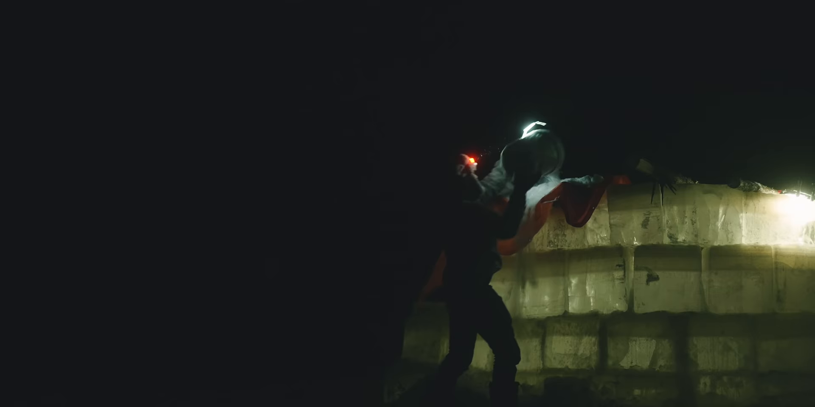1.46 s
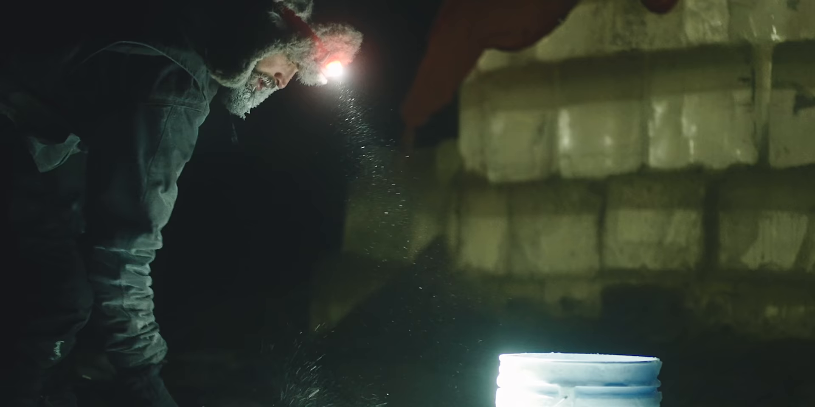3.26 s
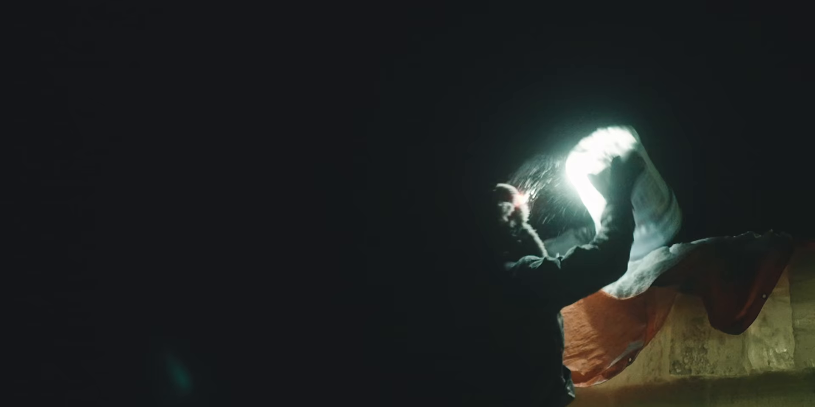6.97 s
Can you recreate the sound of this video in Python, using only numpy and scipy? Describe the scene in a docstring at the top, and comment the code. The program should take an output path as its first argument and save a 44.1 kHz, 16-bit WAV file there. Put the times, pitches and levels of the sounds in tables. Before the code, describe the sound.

Someone shovels snow on a quiet night: crisp digs, squeaky scrapes and loads landing, with pattering clods and soft footsteps.

```python
"""A snowy yard on a still night: someone shovels a few steps away.
The plastic blade crunches in, squeaks free and slaps its load down; this stroke is heard twice,
at the start and near the end. In between the blade knocks on packed snow, powder sifts down,
clods patter and boots crunch, over a faint low rumble.
The crunching is filtered clicks: ice bonds snapping in clumps."""
import sys
import numpy as np
from scipy import signal
from scipy.io import wavfile
from scipy.ndimage import uniform_filter1d

SR = 44100
rng = np.random.default_rng(int(sys.argv[2]) if len(sys.argv) > 2 else 0)


def wrap_up_sound(samples):
    """Save the sound to the file named by the first command line argument, as 16-bit audio."""
    columns = np.atleast_2d(samples).T
    # keep every value between -1 and 1, then stretch to whole-number steps
    tamed = np.clip(columns, -1, 1)
    steps = np.round(tamed * 32767).astype(np.int16)
    wavfile.write(sys.argv[1], SR, steps)


N = 342216
TIME = np.arange(N) / SR
SLAP_S, STROKE_GAP_S = 6.8165, 5.5055  # the load lands; the same stroke is heard again this much earlier
EDGE_HZ = 15850


def amp(db):
    """Decibels to gain."""
    return 10 ** (np.asarray(db) / 20)


def unit(x):
    """Scale to rms 1."""
    return x / np.sqrt(np.mean(x ** 2) + 1e-20)


def add(mix, start_s, sound):
    """Mix a sound in at start_s."""
    part = mix[max(round(start_s * SR), 0):][:len(sound)]
    part += sound[:len(part)]


def twice(x):
    """Add a copy one stroke gap earlier."""
    gap = round(STROKE_GAP_S * SR)
    return x + np.pad(x[gap:], (0, gap))


def colour(x, spectrum, size=4096):
    """Minimum-phase filter from rows of freq_hz, gain_db; attacks stay sharp."""
    hz, db = np.transpose(spectrum)
    bins_hz = abs(np.fft.fftfreq(size, 1 / SR))
    log_gain = np.log(amp(np.interp(np.log(bins_hz + 1), np.log(hz + 1), db)))
    taps = np.fft.ifft(np.exp(np.conj(signal.hilbert(log_gain)))).real[:size // 2]
    return signal.oaconvolve(x, taps)[:len(x)]


def band(x, hz, kind, order=2):
    """Butterworth low-pass or high-pass."""
    return signal.sosfilt(signal.butter(order, min(hz, EDGE_HZ), kind, fs=SR, output="sos"), x + 1e-18)


def resonate(x, hz, width_hz):
    """Two-stage resonance that can follow a pitch curve."""
    carrier = np.exp(2j * np.pi * np.cumsum(hz * np.ones(len(x))) / SR)
    pole = np.exp(-np.pi * width_hz / SR)
    baseband = signal.lfilter([1], [1, -2 * pole, pole ** 2], x * carrier.conj() + 1e-18)
    return unit((carrier * baseband).real)


def swell(peak_s, rise_s, fall_s, roundness=1):
    """Gain 1 at the peak, -20 dB one rise before and one fall after; roundness 1 pointed, 2 a bell."""
    away = np.maximum((peak_s - TIME) / rise_s, (TIME - peak_s) / fall_s)
    return amp(-20 * away ** roundness) * (away < 3)


def swells(rows, roundness):
    """Power sum of swells from rows of peak_s, rise_s, fall_s, gain_db."""
    return np.sqrt(sum((amp(db) * swell(*timing_s, roundness)) ** 2 for *timing_s, db in rows))


def grains(per_s, spread_db, clump_db, clump_s):
    """Ice bonds snap: clicks of uneven size, in clumps."""
    chance, size, sign = rng.random((3, N), dtype=np.float32)
    at, clicks = np.flatnonzero(chance < per_s / SR), np.zeros(N)
    clumps = np.clip(rng.standard_normal(8000), -2, 2)
    db = spread_db * np.minimum(-np.log(1 - size[at]), 4)
    db = db + clump_db * np.interp(TIME[at] / clump_s, np.arange(len(clumps)), clumps)
    clicks[at] = amp(db) * np.sign(sign[at] - 0.5)
    return unit(clicks)


def crumble(clicks, decay_s):
    """Each grain breaks up as one of six short noise bursts."""
    t = TIME[:512]
    choice = rng.integers(0, 6, N)
    bursts = rng.standard_normal((6, len(t))) * np.exp(-t / decay_s) * (1 - np.exp(-2 * t / decay_s))
    return unit(sum(signal.oaconvolve(clicks * (choice == k), unit(bursts[k]))[:N] for k in range(6)))


def blow(db, bright_hz, decay_s, spectrum, rise_s, size=4096):
    """A burst of crushed crystals with the energy of 5 ms at level db."""
    t = TIME[:size]
    burst = rng.standard_normal(size) * np.exp(-t / decay_s) * (1 - np.exp(-(t / rise_s) ** 2))
    sound = band(colour(burst, spectrum), bright_hz, "low", order=1)
    return amp(db) * unit(sound) * np.sqrt(0.005 * SR / size)


def blade(x, dry_db):
    """The plastic blade rings briefly with whatever touches it."""
    # blade modes: freq_hz, width_hz, gain_db
    modes = [(964, 35, -4), (1236, 48, -8), (1954, 47, -9), (2050, 29, -6.5), (3340, 27, 1),
             (3410, 41, -14), (3550, 85, -1), (4540, 63, 2.5), (5460, 110, -5), (6770, 130, 5),
             (7200, 73, -13)]
    t, ring = TIME[:2048], 0
    for hz, width_hz, db in modes:
        envelope = amp(db) * 2 * np.pi * width_hz / SR * np.exp(-np.pi * width_hz * t)
        ring += envelope * np.cos(2 * np.pi * hz * t)
    return amp(dry_db) * x + signal.oaconvolve(x, ring)[:N]


def thud():
    """Packed snow rings dully under a blow."""
    # snow modes: freq_hz, gain_db, t60_s
    modes = [(90, -40, 0.18), (123, -34, 0.11), (157, -28, 0.066), (243, -25.5, 0.037), (352, -23.5, 0.056),
             (553, -30, .025), (702, -25.5, 0.039), (1087, -22, 0.037)]
    t = TIME[:SR // 3]
    ring = sum(amp(db - 60 * t / t60_s) * np.sin(2 * np.pi * hz * t) for hz, db, t60_s in modes)
    return ring * (1 - np.exp(-t / 0.001))


def night():
    """Drifting low rumble, soft hiss and a faint wavering hum."""
    # night air spectrum: freq_hz, gain_db
    spectrum = [(12, -34), (20, -3.5), (38, -5), (96, -11.5), (123, -10.5), (146, -25), (222, -21),
                (388, -30.5), (624, -31.5), (759, -31), (1000, -34), (1120, -34), (6010, -42),
                (8650, -40.5), (16000, -45)]
    # rumble drift: time_s, gain_db
    drift = [(0, 3), (.7, -1.5), (1.3, 0.5), (2.1, -7.5), (3.0, -1), (4.0, 3), (5.4, 1), (6.2, -1.5),
             (6.8, 1), (7.7, -9)]
    air_db, rumble_hz, hum_db, hum_hz = -56, 86, -68.5, 120.8
    air = unit(colour(rng.standard_normal(N), spectrum, size=16384))
    rumble = signal.sosfiltfilt(signal.butter(2, rumble_hz, fs=SR, output="sos"), air)
    air += rumble * (amp(np.interp(TIME, *np.transpose(drift))) - 1)
    wander_cycles = 0.607 * np.cumsum(rng.standard_normal(N)) / np.sqrt(SR)
    hum = np.sqrt(2) * np.sin(2 * np.pi * (hum_hz * TIME + wander_cycles))
    return amp(air_db) * air + amp(hum_db) * hum


def yard(x):
    """Snow swallows most of the sound; the walls return a weak dull scatter."""
    t, t60_s, wet_db = TIME[:SR // 2], 0.21, -22
    tail = band(rng.standard_normal(len(t)) * amp(-60 * t / t60_s) * (t > 0.008), 3600, "low")
    return x + amp(wet_db) * signal.oaconvolve(x, tail / np.linalg.norm(tail))[:N]


def steps():
    """Snow collapses under a boot in small dull jerks while the weight bears down."""
    # footfalls: start_s, length_s, level_db
    footfalls = [(1.536, 0.29, -54), (1.998, 0.12, -56.5), (2.726, 0.073, -47), (3.078, .13, -53.5),
                 (3.303, 0.114, -64.5), (3.65, 0.076, -58), (3.723, 0.06, -53), (4.79, .12, -61.5),
                 (5.31, 0.14, -55), (7.576, 0.071, -54)]
    # boot crunch spectrum: freq_hz, gain_db
    spectrum = [(47, -27.5), (80, 1.5), (280, -7.5), (339, -5), (412, -3), (560, -6.5), (1680, -11.5),
                (2470, -19.5), (3630, -17), (8000, -30), (10400, -63), (17600, -120)]
    attack_s, release_s = 0.022, 0.012
    weight, t = np.zeros(N), TIME[:SR // 2]
    for start_s, length_s, db in footfalls:
        release = np.exp(-np.maximum(t - length_s, 0) / release_s)
        add(weight, start_s, amp(db) * np.minimum(t / attack_s, 1) * release)
    return unit(colour(grains(1300, 2.15, 3.3, 0.0078), spectrum)) * weight


def thumps():
    """Deep snow cushions a weight: a few low cycles, no ring."""
    # boots and lumps sinking in: start_s, level_db, pitch_hz
    impacts = [(1.394, -37.5, 105), (2.78, -45, 154), (2.85, -53, 220), (3.087, -44, 140),
               (3.305, -48, 170), (3.548, -50.5, 201), (4.531, -47, 210), (4.858, -49, 150)]
    out, t = np.zeros(N), TIME[:round(0.024 * SR)]
    for start_s, db, hz in impacts:
        add(out, start_s, amp(db) * np.sin(2 * np.pi * hz * t) * np.hanning(len(t)))
    return out


def slides():
    """Loose snow slides along the blade, also before each load lands."""
    # slides: peak_s, rise_s, fall_s, gain_db
    runs = [(4.28, .42, .24, -56.5), (4.49, .025, 0.23, -50.5), (4.64, 0.21, 0.21, -49),
            (4.9, .03, 0.11, -61), (7.218, 0.098, 0.03, -53.5)]
    # sliding spectrum: freq_hz, gain_db
    spectrum = [(200, -6), (500, -7.5), (1000, -5.5), (2000, 0.5), (3500, -2.5), (5000, -8.5),
                (8000, -17.5), (12000, -16.5)]
    flow = swells(runs, roundness=1.58) + twice(amp(-56) * swell(SLAP_S, 0.24, 0.024))
    friction = blade(grains(3000, 2.9, 3.1, 0.014), dry_db=-3.5)
    return amp(-0.5) * unit(colour(friction, spectrum)) * flow


def spill(gain_db, fall_s):
    """Envelope of snow spilling from each landed load."""
    return twice(amp(gain_db) * swell(SLAP_S + 0.013, 0.024, fall_s))


def crumbs():
    """Crumbs roll in showers; small clods fall at random among them."""
    # showers: peak_s, rise_s, fall_s, gain_db
    showers = [(1.85, .7, 1, -54), (2.44, .12, 0.27, -54), (2.93, 0.24, 0.36, -53),
               (3.3, 0.074, 0.42, -59.5), (4.4, 0.74, 0.79, -58.5), (7.38, 0.14, 0.55, -54.5)]
    # crumb spectrum: freq_hz, gain_db
    crumb_spectrum = [(150, -51), (250, -28), (363, -9), (393, -10), (426, 0.5), (480, -2.5), (705, -2),
                      (1200, -4.5), (2240, -4.5), (6000, -13), (7800, -39), (13200, -120)]
    # small clod spectrum: freq_hz, gain_db
    patter_spectrum = [(120, -14), (350, -4.5), (900, -2.5), (2000, -0.5), (2900, -6), (4300, -3),
                       (7000, -16), (16000, -23)]
    flow = np.hypot(swells(showers, roundness=1.31), spill(gain_db=-49, fall_s=0.73))
    rolling = unit(colour(grains(1500, 3.0, 2.8, 0.012), crumb_spectrum))
    patter = unit(colour(crumble(grains(45, 2.0, 0.8, 0.078), decay_s=0.0015), patter_spectrum))
    return (amp(-4.5) * rolling + amp(-8) * patter) * flow


def powder():
    """Fine powder hisses down; ice grains tick in it."""
    # clouds and puffs: peak_s, rise_s, fall_s, gain_db
    clouds = [(2.03, .6, 0.87, -53), (2.785, 0.19, .05, -63), (3.14, 0.14, 0.14, -57.5),
              (3.735, .015, .12, -62), (4.15, 0.65, 1.3, -64), (4.63, 0.24, 0.41, -53.5),
              (6.47, .12, .3, -68.5), (7.5, 1.1, 1.5, -66.5)]
    # powder spectrum: freq_hz, gain_db
    spectrum = [(300, -41), (1500, 3), (2600, -5.5), (3800, 5), (5200, -4.5), (8500, -0.5), (14000, -5.5),
                (16000, -10)]
    flow = np.hypot(swells(clouds, roundness=1.17), spill(gain_db=-52.5, fall_s=0.36))
    hiss = grains(4000, 1.9, 0.89, 0.015)
    ticks = crumble(grains(160, 2.1, 1.5, 0.03), decay_s=0.0005)
    return amp(1.94) * unit(colour(hiss + amp(-15) * ticks, spectrum)) * flow


def stray_crumbs():
    """A few crumbs drop at any time."""
    spectrum = [(200, -9), (600, -0.5), (1800, -4.5), (2800, -13), (4200, -6.5), (16000, -23)]
    return amp(-72.5) * unit(colour(grains(80, 2.7, 1.9, 0.089), spectrum))


def clods():
    """Heavy clods pat dully, bits of crust tick."""
    # large clods and crust snaps: time_s, gain_db, weight_db, treble_db
    drops = [(1.634, -42.5, -9, -21), (1.717, -40, -22, -6), (1.784, -39.5, -30, -6.5),
             (1.943, -34, -16, -4.5), (2.023, -34.5, -21, -19), (2.409, -45, -28, -7),
             (2.435, -35.5, -33, -4), (2.612, -43.5, -34, 2), (2.729, -39.5, -23, -5.5),
             (2.804, -44, -3, 0), (2.881, -40, -26, -5), (2.928, -43, -20, 0), (2.975, -42.5, -25, -11),
             (3.369, -46.5, -13, -5), (5.331, -43, -7, -10), (7.129, -36.5, -35.5, -6),
             (7.365, -46, -13, 0), (7.392, -40, -4, -5), (7.556, -35.5, -13, -18), (7.65, -39.5, -15, -11),
             (7.667, -41.5, -11, -4), (7.713, -43.5, -12, -12), (7.751, -42, -6, -6.5)]
    out = np.zeros(N)
    for time_s, db, weight_db, treble_db in drops:
        bass_db = weight_db + 16.5
        spectrum = [(50, bass_db - 15), (150, bass_db), (420, bass_db - 1.5), (850, -2), (2000, -4.5),
                    (2800, -13.5), (4000, treble_db - 4), (9000, treble_db - 13), (16000, treble_db - 21)]
        pat = blow(db + 0.45 * max(bass_db, 0), 10500, 0.0021, spectrum, rise_s=0.0014)
        add(out, time_s + 0.0018, pat)
    return amp(-6.5) * out


def knocks():
    """The blade hits packed snow, rebounds and touches again."""
    # blade contacts: start_s, gain_db, bright_hz, decay_s
    contacts = [(4.4352, -21, 5000, 0.0027), (4.4382, -25, 9000, 0.0068), (4.462, -37, 2500, 0.012),
                (4.468, -32, 15000, 0.003), (4.4703, -31.5, 15000, 0.0049), (4.381, -42, 6000, 0.011),
                (4.885, -38, 12100, 0.0092), (7.193, -47, 6000, .007), (7.208, -42.5, 6000, .008),
                (7.22, -47, 8000, 0.0039), (7.233, -45, 6000, .004)]
    # knock spectrum: freq_hz, gain_db
    spectrum = [(60, -8), (130, -2.5), (210, -4), (380, -9), (620, -7), (1200, -12), (1900, -4),
                (2600, -11.5), (3350, -7.5), (6600, -11.5), (8000, -16.5), (16000, -17)]
    out = np.zeros(N)
    for start_s, db, bright_hz, decay_s in contacts:
        add(out, start_s, blow(db, bright_hz, decay_s, spectrum, rise_s=0.00044))
    out = amp(-7.5) * blade(out, dry_db=1.5)
    add(out, contacts[0][0], amp(-11.5) * thud())  # the hardest knock shakes the snow
    return out


def squeaks():
    """The slips briefly fall into step: a short, unsteady, rising note."""
    # cold snow squeaks: start_s, gain_db, start_hz
    notes = [(3.185, -48.5, 2240), (3.198, -51.5, 1300), (3.86, -54, 1190), (3.882, -44.5, 1072),
             (5.138, -53.5, 913), (5.852, -53, 460), (5.879, -47.5, 733), (5.899, -48.5, 1424),
             (5.928, -43.5, 1786), (5.966, -48, 1030)]
    length_s, octaves_per_s = 0.022, 9.1
    out, t = np.zeros(N), TIME[:round(length_s * SR)]
    for start_s, db, start_hz in notes:
        jitter = unit(uniform_filter1d(rng.standard_normal(4096), size=24))[:len(t)]
        hz = start_hz * 2 ** (octaves_per_s * t) * (1 + 0.17 * jitter)
        note = np.sin(2 * np.pi * np.cumsum(hz) / SR) * np.hanning(len(t))
        add(out, start_s, amp(db) * unit(note))
    return amp(-3) * out


def scrapes():
    """Stick-slip rings the hollow under the blade; it shrinks on the draw, so the pitch climbs."""
    # blade drags: peak_s, rise_s, fall_s, gain_db, hollow_hz, grit_db
    drags = [(2.985, .04, 0.062, -52.5, 780, -11.5), (3.17, 0.14, 0.16, -49, 725, -6),
             (3.535, 0.039, .04, -56.5, 1290, -11), (3.882, .11, 0.06, -46.5, 1120, -1.5),
             (5.118, 0.077, 0.11, -55, 780, -8), (5.861, 0.025, .022, -48.5, 630, -10),
             (5.925, 0.081, 0.1, -44, 1200, -7.5), (5.972, 0.1, 0.056, -46, 1370, -6.5)]
    # grit spectrum: freq_hz, gain_db
    grit_spectrum = [(1530, -38.5), (2600, -5.5), (4230, 2), (5650, -6), (8070, -8), (13600, -15),
                     (16000, -18)]
    rub_spectrum = [(150, -34), (500, 5), (1100, -2.5), (2150, 9), (2700, -7), (6000, -39)]
    octaves_per_s, release_s = 6.1, 5.831
    force, grit_gain, hz = np.zeros(N), np.zeros(N), np.full(N, drags[0][4], float)
    for peak_s, rise_s, fall_s, db, hollow_hz, grit_db in drags:
        pull = amp(db) * swell(peak_s, rise_s, fall_s, roundness=1.56)
        leads = pull > force  # the strongest drag sets the sound
        force[leads], grit_gain[leads] = pull[leads], amp(grit_db)
        hz[leads] = hollow_hz * 2 ** (octaves_per_s * np.clip(TIME[leads] - peak_s, -rise_s, fall_s))
    slips = grains(5000, 1.6, 1.5, 0.0038)
    hollow = resonate(slips, hz, width_hz=670) + amp(1) * resonate(slips, hz * 1.4, width_hz=1000)
    rub = unit(colour(slips, rub_spectrum))
    body = unit(hollow + amp(-3.5) * rub)
    grit = unit(colour(slips, grit_spectrum)) * grit_gain
    out = (amp(-2) * body + amp(1) * grit) * force
    add(out, release_s, blow(-53, 9000, 0.0023, grit_spectrum, rise_s=0.00083))  # blade ticks free
    return out


def slap():
    """A load lands as a quick run of lumps; the heaviest sets the packed snow thudding."""
    # lumps of one load: delay_s, level_db, bright_hz, decay_s
    lumps = [(-.0004, -30, 2200, 0.0039), (.0055, -25, 6900, 0.001), (.008, -29.5, 2480, 0.0023),
             (.014, -29, 14000, 0.0012), (0.0167, -32, 9000, .0022), (.022, -46, 1200, .007)]
    # lump impact spectrum: freq_hz, gain_db
    spectrum = [(100, -16.5), (300, -3), (700, -3), (1150, -2), (2300, -3), (3100, -13), (4400, -3),
                (5800, -10.5), (7500, -10), (16000, -10.5)]
    out = np.zeros(N)
    for delay_s, db, bright_hz, decay_s in lumps:
        add(out, SLAP_S + delay_s, blow(db, bright_hz, decay_s, spectrum, rise_s=0.0011))
    add(out, SLAP_S + 0.00426, thud())
    return out


def thrust():
    """The edge bites with a bump, breaks crust and crystals, then stalls; the buried blade rubs dully."""
    # crunch spectrum: freq_hz, gain_db
    spectrum = [(100, -14.5), (250, -10.5), (380, -8), (520, -10), (850, -6.5), (1450, -6), (2000, -4.5),
                (2700, -7.5), (3800, -5), (5200, -10.5), (7000, -8), (13000, -10.5), (16000, -19)]
    bite_s, crust_s, peak_s, stall_s = 5.493, 5.511, 5.54, 5.594
    crunch = colour(blade(grains(16000, 2.3, 0.57, 0.0031), dry_db=6), spectrum)
    mid_ring = resonate(crunch, 1370, width_hz=580)
    body = unit(unit(band(crunch, 4160, "low", order=4)) + amp(-15) * mid_ring)
    grit = unit(band(crunch, 4800, "high", order=4))
    rub = unit(band(colour(grains(9000, 2.8, 1.2, 0.005), spectrum), 2260, "low", order=1))
    stall_db = -14 * np.clip((TIME - stall_s) / 0.026, 0, 1)
    body *= amp(-31 + stall_db / 2) * swell(peak_s, 0.072, 0.092, roundness=1.22)
    grit *= amp(-35 + stall_db) * swell(crust_s, 0.032, 0.18, roundness=0.72)
    rub *= amp(-45.5) * swell(peak_s, 0.18, 0.25)
    out = body + grit + rub
    t = TIME[:SR // 4]
    bump = np.sin(2 * np.pi * 95 * t) * np.exp(-t / 0.012)
    bump += 0.77 * np.sin(2 * np.pi * 190 * t) * np.exp(-t / 0.0053)
    add(out, bite_s, amp(-29) * bump)
    return out


def scene():
    """Shovel work over the quiet of the night, mono."""
    strokes = twice(thrust() + scrapes() + squeaks() + slap())
    boots = steps() + thumps()
    loose_snow = slides() + crumbs() + powder() + stray_crumbs()
    work = strokes + boots + loose_snow + knocks() + clods()
    return (yard(work) + night())[None]


def record(dry):
    """Steep low-pass at EDGE_HZ."""
    taps = signal.firwin(511, EDGE_HZ, window=("kaiser", 9), fs=SR)
    return signal.oaconvolve(dry, taps[None], "same")


dry = scene()
out = record(dry)
wrap_up_sound(out)
```